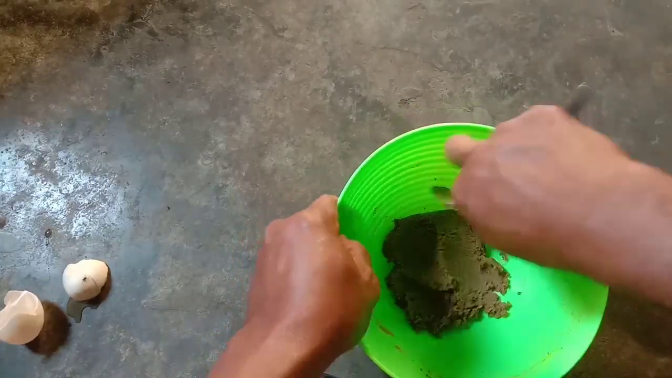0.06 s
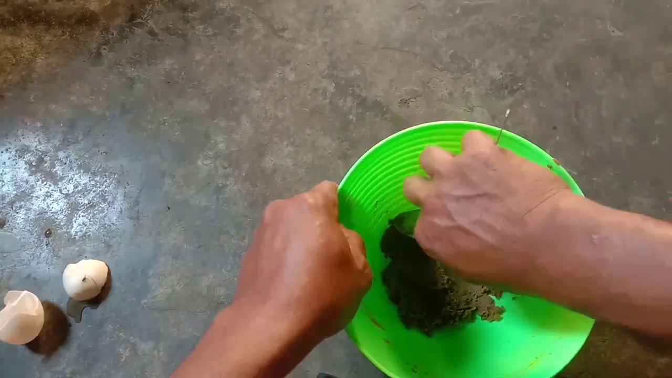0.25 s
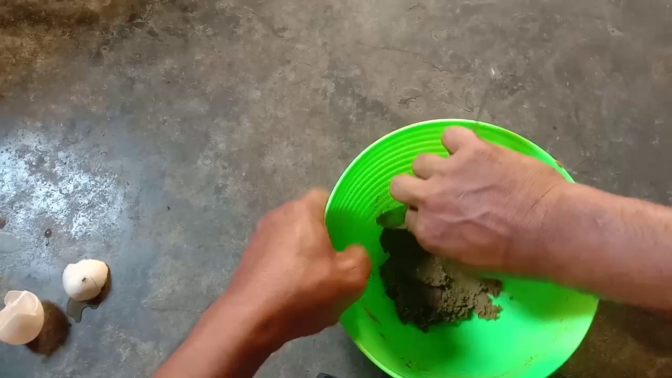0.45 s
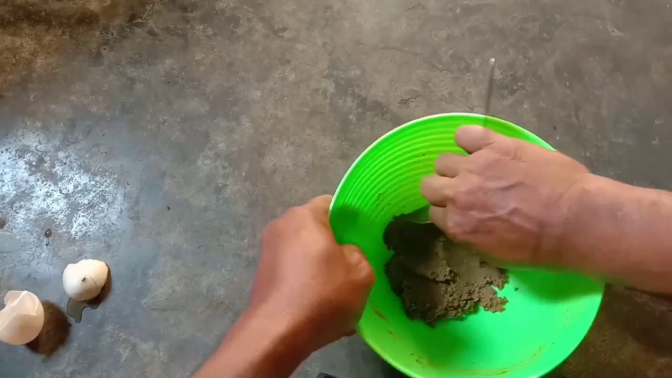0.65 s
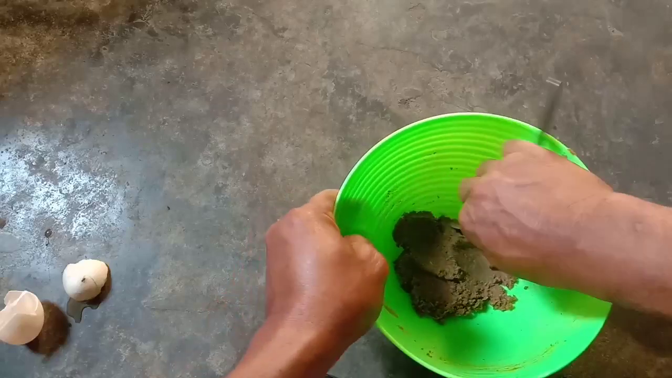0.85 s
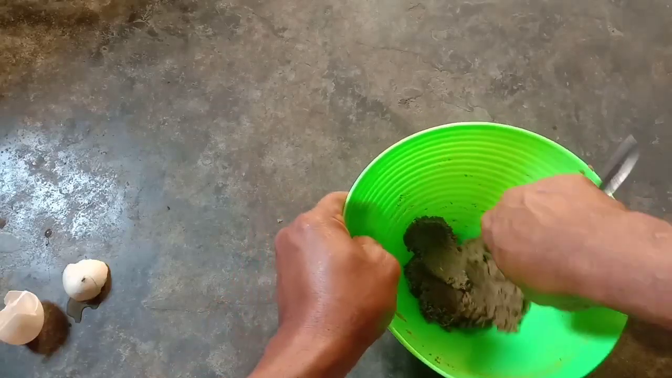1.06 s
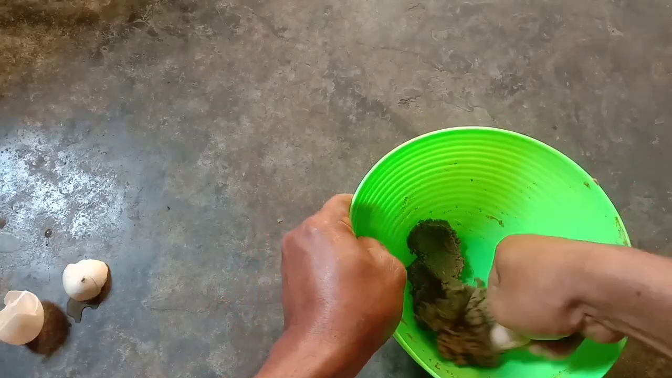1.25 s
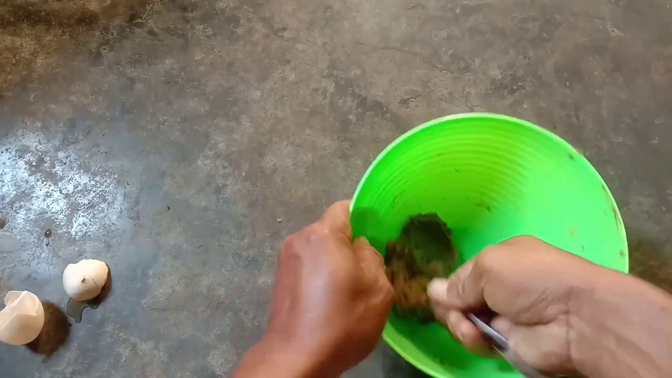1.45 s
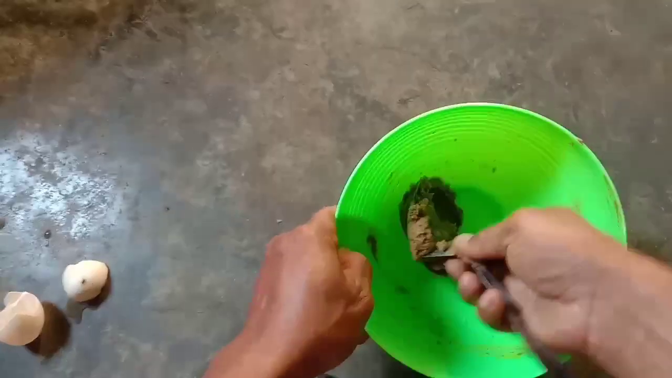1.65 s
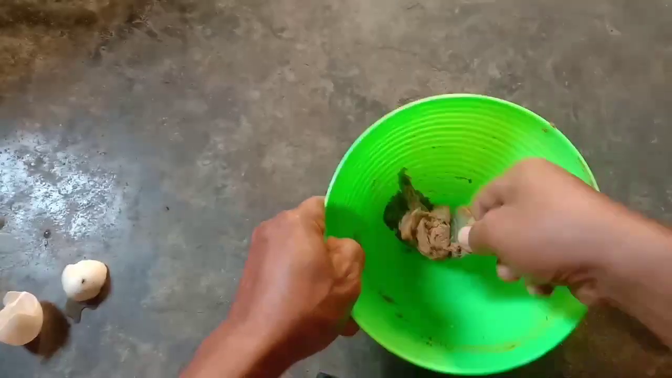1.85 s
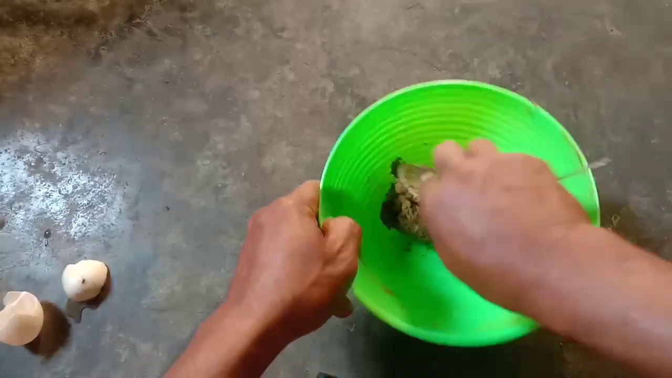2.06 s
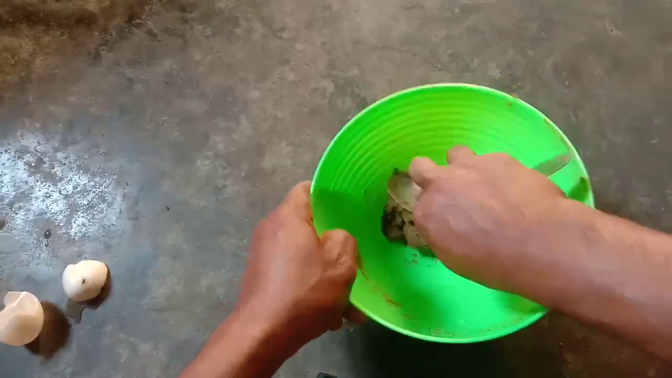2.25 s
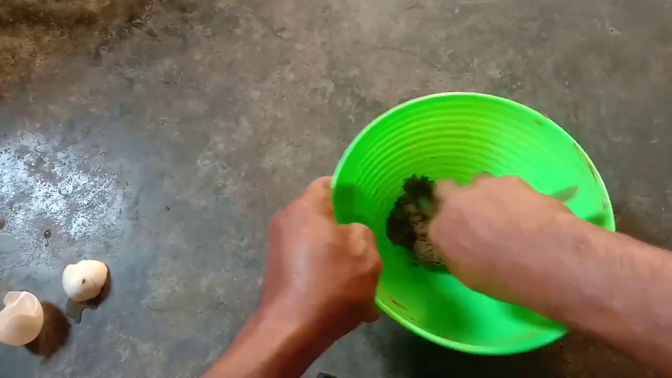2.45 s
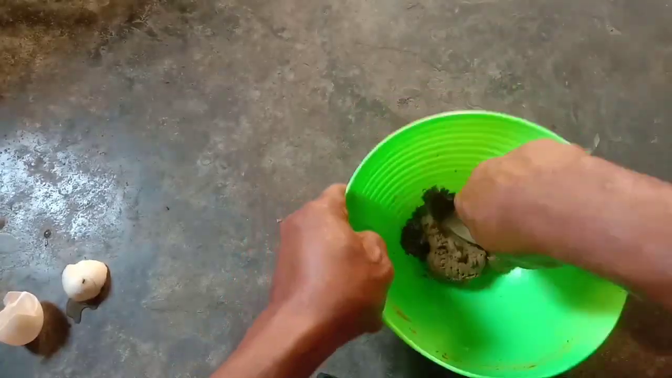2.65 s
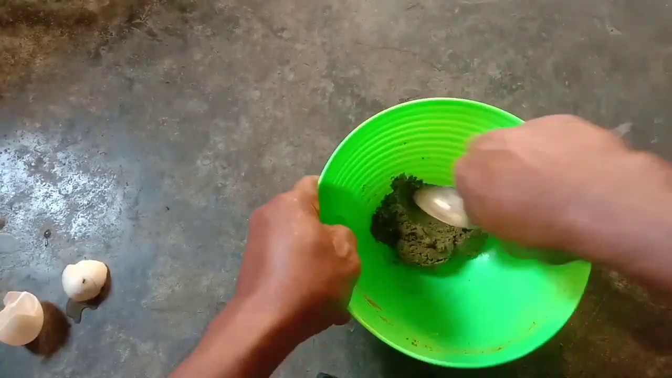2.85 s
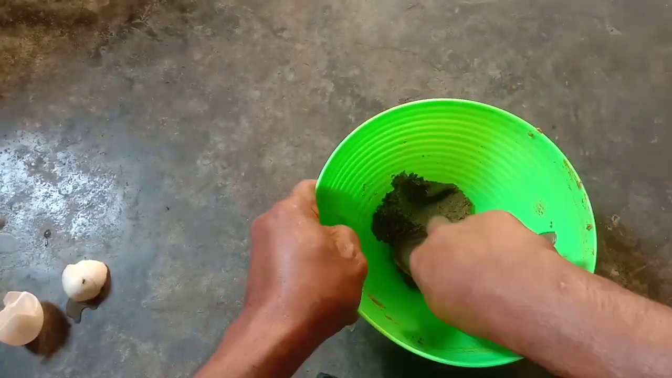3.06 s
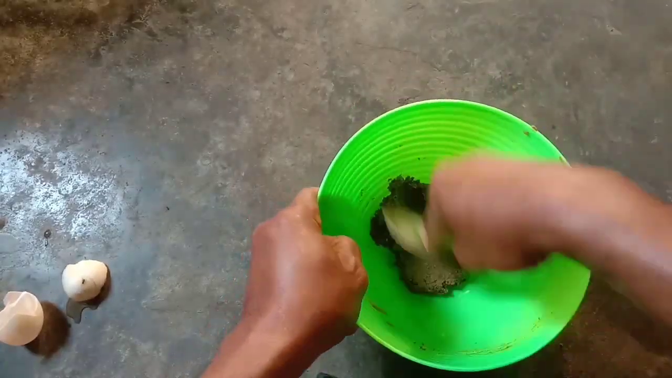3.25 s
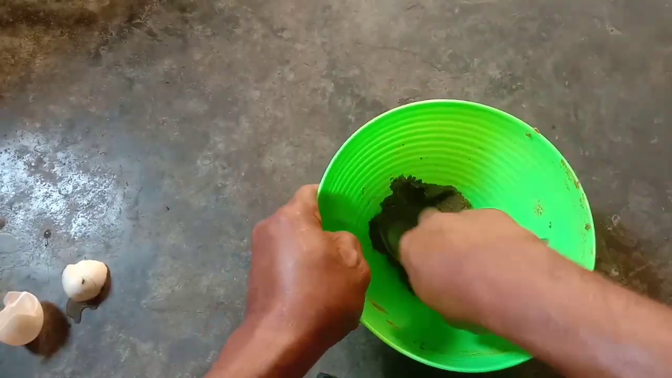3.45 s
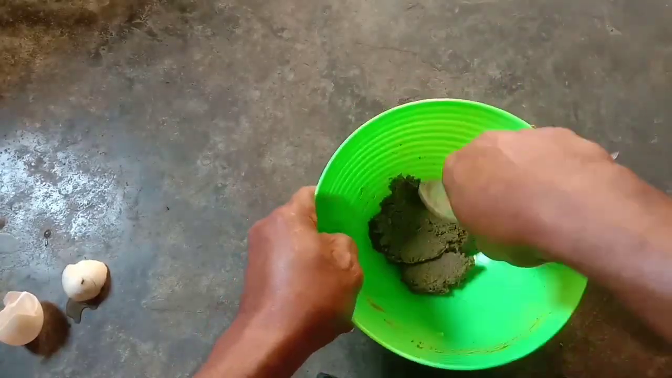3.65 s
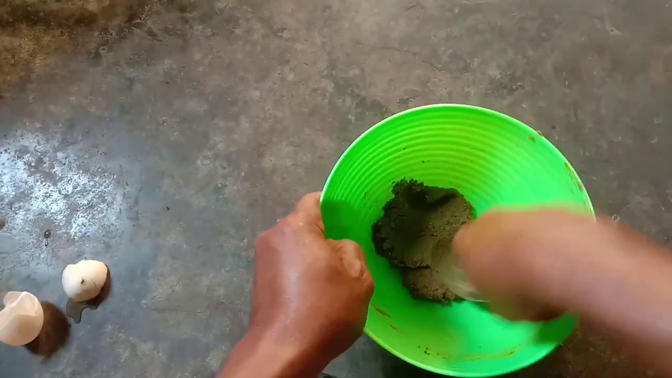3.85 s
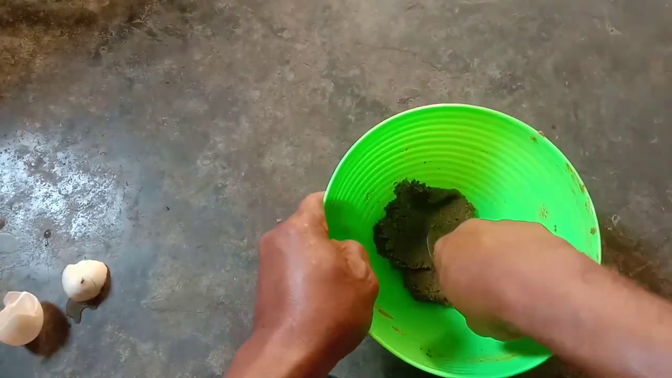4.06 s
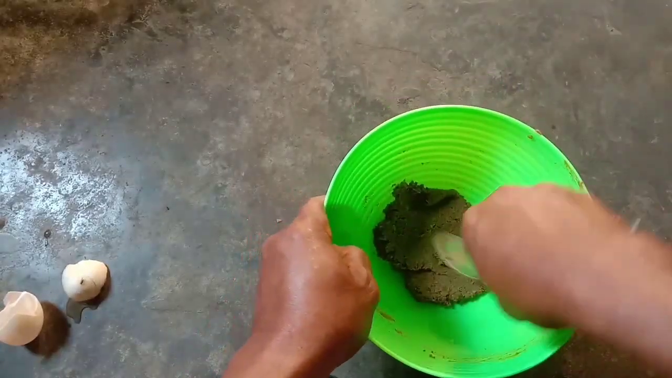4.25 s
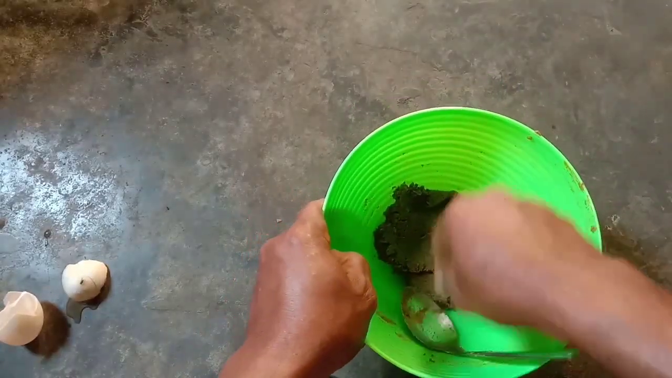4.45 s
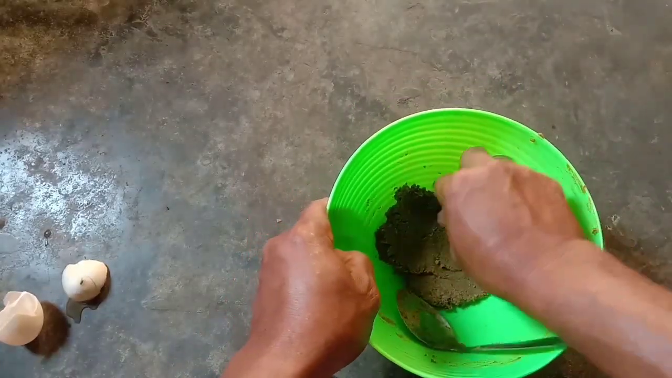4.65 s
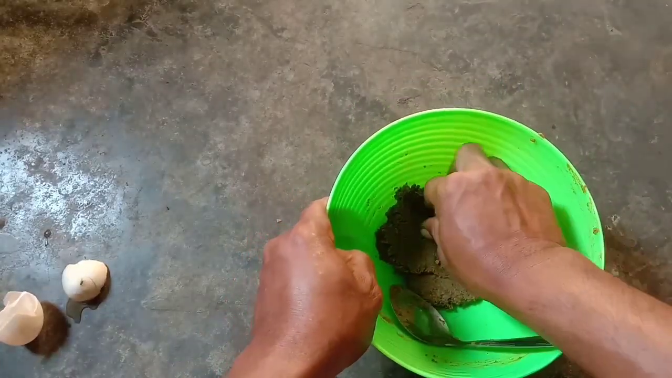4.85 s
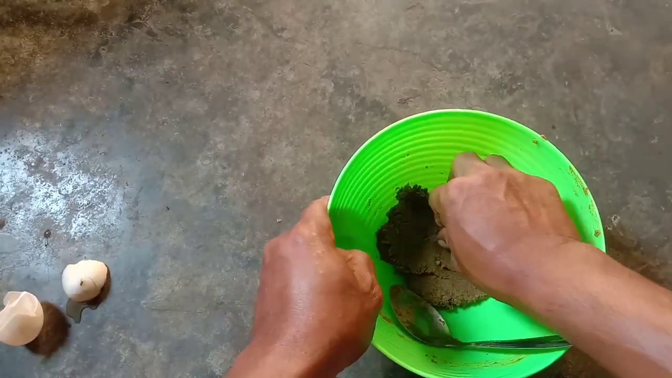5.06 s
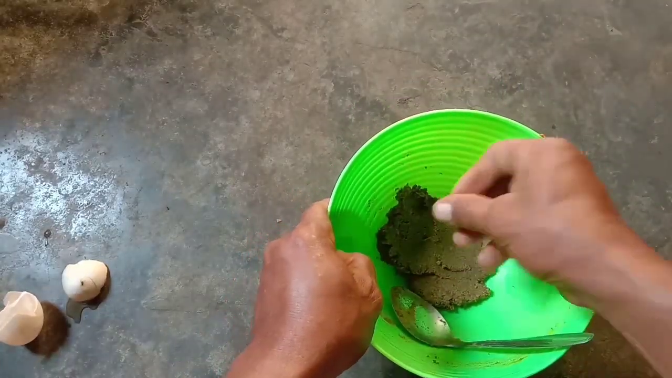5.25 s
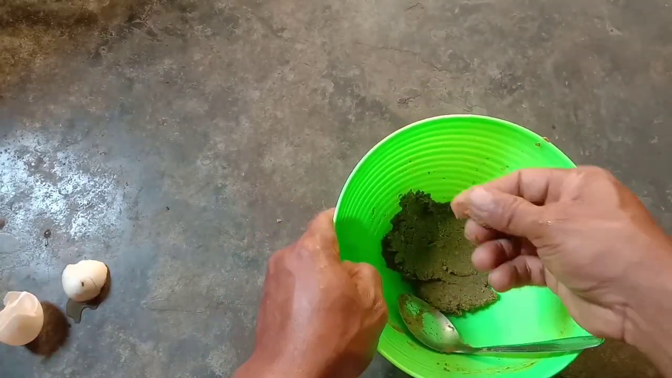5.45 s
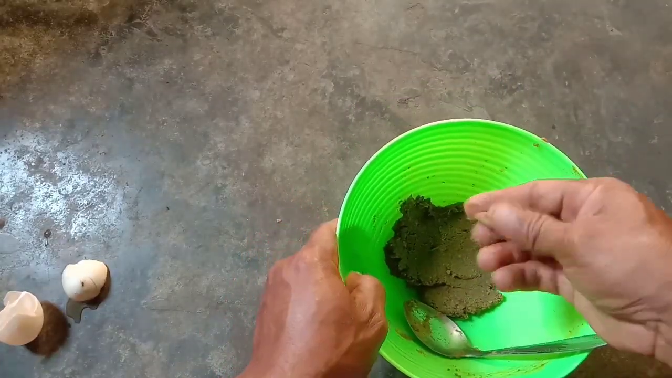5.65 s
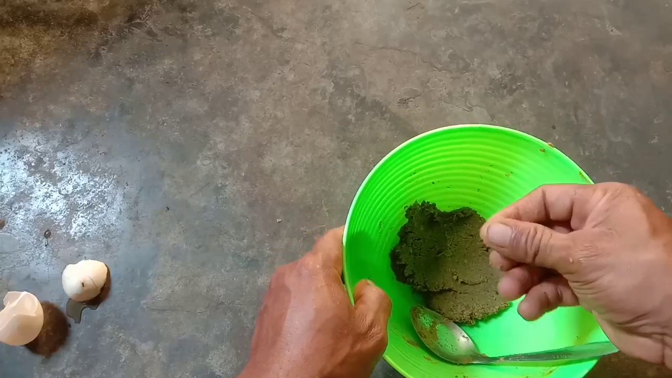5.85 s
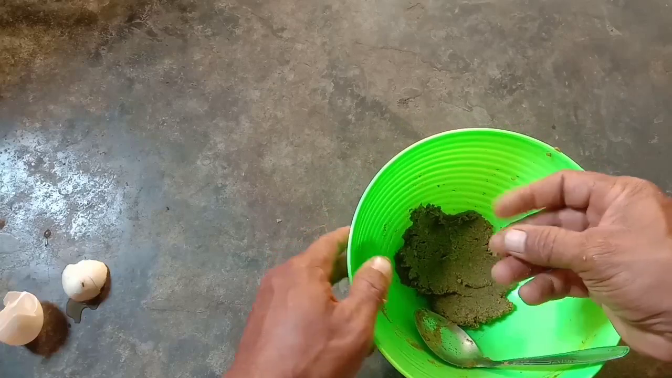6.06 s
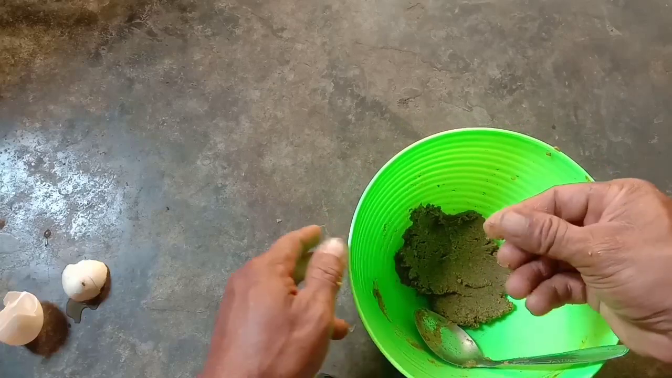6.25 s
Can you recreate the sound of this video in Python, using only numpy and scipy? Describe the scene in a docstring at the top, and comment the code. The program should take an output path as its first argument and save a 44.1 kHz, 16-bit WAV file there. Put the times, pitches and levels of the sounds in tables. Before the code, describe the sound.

Irregular hollow knocks of a plastic bowl on a hard floor, small spoon ticks and grainy scrapes, heard close by a phone with a short bare-room echo. The blade snaps off the wall, scoops the dough in paired strokes, then the spoon falls, rattles briefly and settles. After that almost nothing: a soft tap, faint rubbing, quiet air and microphone hiss.

```python
"""Spoon and stiff dough, close

Small bare room, concrete floor: a metal spoon works gritty dough in a plastic bowl, close to a phone.
Bowl knocks, spoon ticks, snaps of the slipping blade and the clatter and thump of the dropped spoon are
impulses ringing through resonances. Scraping blade, sliding spoon and rubbing fingers are random grains
coloured by dough and wall. Near echoes and a room tail follow, over faint tones and air and microphone hiss."""
import sys
import numpy as np
from scipy import signal
from scipy.fft import rfft, irfft
from scipy.io import wavfile
from scipy.ndimage import uniform_filter1d

SR = 44100
rng = np.random.default_rng(int(sys.argv[2]) if len(sys.argv) > 2 else 0)


def persist_wave(psi):
    """Save psi, clipped to +-1, as 16-bit WAV."""
    counts = np.round(np.clip(psi, -1, 1) * 32767).astype(np.int16)
    wavfile.write(sys.argv[1], SR, np.atleast_2d(counts).T)


N = 277822
T = np.arange(N) / SR  # s

# faint thin tones from far outside: [t/s, spread/s, f/Hz, level/dB]
FAR_TONES = [(2.206, 0.024, 1270, -66.5), (5.4, 0.037, 1182, -59.5)]
# colour of room air and microphone hiss: [f/Hz, level/dB]
HISS_COLOUR = [(25, -26), (65, -1), (150, -1.5), (400, -6.5), (900, -15), (1270, -10), (1800, -17.5),
               (5000, -20), (6500, -20.5), (7150, 0.5), (7600, -8.5), (8600, -28), (13500, -31),
               (15400, -22.5)]
HISS_DB = -67
# microphone port response: [f/Hz, level/dB]
PORT_RESPONSE = [(30, -7), (75, -5), (130, -1), (6100, 1), (6600, -7), (7200, 7.5), (7900, -4),
                 (8700, -3.5), (10500, -10.5), (13800, -15.5), (15000, 6), (15900, -5.5)]
TOP_HZ = 15750  # upper band edge of the phone
# decay of the bare room by band: [f/Hz, t60/s, echo level/dB]
ROOM_BANDS = [(100, 0.26, -3.5), (310, 0.31, -8), (720, 0.35, -9.5), (1391, 0.37, -7), (2950, 0.43, -10.5),
              (6000, 0.44, -8.5), (14000, 0.26, -12)]
# hand and arm throw the sound back: [delay t/s, level/dB]
HAND_ECHOES = [(.0029, -18.5), (.0056, -13.5)]

# the bowl knocks on the floor; the 213 Hz row is the low thump of the dropped spoon landing:
# [t/s, thud level/dB, pitch f/Hz]
LOW_BLOWS = [(.0464, -11.5, 660), (.0955, -26.5, 860), (.2418, -29.5, 595), (.28, -35, 600),
             (.442, -30, 596), (.4577, -18, 713), (.4653, -21.5, 510), (.6513, -9, 628), (.83, -30.5, 650),
             (1.1927, -27, 627), (1.394, -34.5, 670), (1.7633, -15, 507), (2.973, -46, 587),
             (3.2995, -12, 654), (3.4225, -26.5, 666), (3.606, -40, 546), (3.7535, -13.5, 647),
             (3.7801, -23, 570), (3.812, -27.5, 507), (3.836, -27.5, 580), (4.004, -31, 612),
             (4.0549, -25.5, 654), (4.3114, -22.5, 625), (4.3724, -31, 633), (4.4235, -30, 213),
             (4.699, -26, 538), (5.307, -44.5, 510)]
# low ring of bowl and room after a blow: [f/Hz, relative level/dB]
RING_MODES = [(138, -9.5), (292, -6.5), (316, -2), (386, 3), (482, -5), (522, -6), (574, -16), (644, -3),
              (700, -0.5), (760, 3.5), (836, 2), (1250, -2)]
RING_T60_S = 0.3  # at 400 Hz
BOOM_DB = -13.5  # boom of the wall, added to the thud
# colour of a hard contact: [f/Hz, level/dB]
CLICK_COLOUR = [(300, -7.5), (900, 3), (1250, 8), (1800, -3.5), (2400, 5.5), (4200, -5), (6000, -4.5),
                (8000, -15), (15000, -36)]
# a blow at HARD_KNOCK_DB has a click at CLICK_DB; growth is dB of click per dB of force
HARD_KNOCK_DB, CLICK_DB, CLICK_GROWTH = -8.5, -4, 0.85
CRUNCH_MS, CRUNCH_DB = 1.0, -15.5  # decay and level of the gritty roughness of each contact
# a knock above the first level makes the base land twice: delay and relative level
REBOUND_FROM_DB, REBOUND_S, REBOUND_DB = -11.5, 0.00335, -9

# plastic wall under the spoon: [f/Hz, width/Hz, level/dB]
WALL_MODES = [(1300, 150, 1), (1528, 560, 2), (1875, 290, -2), (2225, 720, 4), (2835, 620, 3),
              (3480, 1100, -6), (4120, 380, -15), (5300, 240, -10.5), (6126, 500, -0.5), (7580, 700, -5),
              (11960, 2000, -18)]
# the spoon strikes the wall; the two bright ones near 1.5 s are snaps as the blade slips off:
# [t/s, level/dB, brightness/dB per octave]
TICKS_AND_SNAPS = [(0.213, -31.5, -4), (0.395, -34.5, -7), (.4257, -29.5, -11.5), (.563, -17, -6.5),
                   (0.8285, -24.5, -6.5), (1.0283, -26.5, -7.5), (1.1168, -25.5, -6.5), (1.502, -16, 11.5),
                   (1.527, -20.5, 7.5), (1.9987, -45, -2), (3.2056, -30, 7), (3.778, -29.5, 4),
                   (4.6748, -26.5, -5), (4.724, -31, -7)]
CHATTER_MS, CHATTER_HALVING_DB = 0.76, 7.5  # decay at neutral brightness; added brightness that halves it
# the spoon is dropped and clatters to rest
DROP_S, DROP_DB, DROP_BRIGHTNESS_DB, DROP_CHATTER_MS = 4.405, -14, -3, 3
CLATTER_GAP_S, CLATTER_DB = 0.008, -5.5  # its rebounds, against the first blow
# steel spoon ringing after a blow: [f/Hz, relative level/dB, t60/s]
SPOON_MODES = [(1243, -11.5, 0.45), (1460, -12.5, .33), (2060, -1.5, 0.21), (2495, -2, 0.18),
               (3036, -10, 0.44), (4570, -9.5, 0.79)]
SPOON_RING_DB = -54

# colours of crushed grit and of dragged dough: [f/Hz, level/dB]
GRIT_COLOUR = [(600, -0.5), (950, -14.5), (1300, 5), (1850, 12), (2300, -1), (3000, 14.5), (4300, -2.5),
               (6000, 10.5), (7500, -11), (9500, -59.5), (16000, -52)]
DRAG_COLOUR = [(60, -30.5), (150, -5), (300, -2.5), (520, 6), (700, 5.5), (1000, -6), (1300, -20),
               (1900, -29.5), (5000, -47)]
SLIP_DB, SLIPS_PER_S = 3.5, 380  # unevenness and rate of the blade's sticking and slipping
# one long scrape round the wall: [t/s, force/dB, finest sand level/dB]
SCRAPE_PATH = [(0.7, -53, -95), (0.776, -53, -85.5), (0.826, -46, -86), (0.878, -34, -58), (0.92, -52, -85),
               (1.01, -47, -98), (1.03, -34.5, -69), (1.046, -33, -53.5), (1.068, -44, -74),
               (1.124, -37.5, -64.5), (1.168, -50.5, -72), (1.268, -50, -94), (1.29, -37.5, -58.5),
               (1.318, -52, -67), (1.39, -41.5, -57), (1.416, -73, -90), (1.438, -46, -62.5),
               (1.485, -63.5, -111)]
SCRAPE_GRIT_DB = -4.5  # grit against the force
SCRAPE_DRAG_DB, SCRAPE_CLEARING_DB_PER_S = -48, -20.5  # the drag fades as the blade leaves the dough
# pressing harder raises the rasp
LIGHT_RASP_HZ, HEAVY_RASP_HZ, LIGHT_FORCE_DB, HEAVY_FORCE_DB = 1400, 2640, -52.5, -35.5
# the edge bites, then the back shoves the dough; in the last row the dropped spoon slides and lands in it:
# [first push t/s, wait for second/ms, first level/dB, second level/dB]
SCOOPS_AND_SLIDE = [(1.535, 87, -50.5, -39), (2.06, 84, -78.5, -64.5), (2.675, 82.5, -54, -40.5),
                    (3.215, 52, -52, -43.5), (3.559, 73, -64, -57), (4.395, 41, -56.5, -38)]
FIRST_WIDTH, SECOND_WIDTH = 0.46, 0.28  # rise time as a share of the wait between them
# blade or fingers rub over the dough: [t/s, rise/ms, level/dB, rasp f/Hz]
DOUGH_RUBS = [(.012, 37, -44.5, 2230), (.125, 95, -60.5, 2240), (.525, 20, -58, 3500),
              (1.865, 67, -60.5, 3300), (2.309, 22, -58, 2700), (3.865, 19.5, -60.5, 4300),
              (4.126, 70, -72, 4200), (5.515, 108, -68, 3200), (5.94, 69, -67.5, 3500)]
RELEASE_SHARE = 0.58  # the force lets go in this share of its rise time
# touch of the first push and of the second: [grit level/dB, drag level/dB, finest sand level/dB, rasp f/Hz]
FIRST_TOUCH = (-2.5, 1, -10.5, 4990.5)
SECOND_TOUCH = (-9.5, 0.5, -47, 3108)
# touch of a rub, which has its own rasp: [grit level/dB, drag level/dB, finest sand level/dB]
RUB_TOUCH = (0, .5, -32.5)


def undb(db):
    """Decibels to gain."""
    return 10 ** (np.asarray(db) / 20)


def unit(x):
    """Scale to standard deviation 1."""
    return x / np.std(x)


def crest(x):
    """Scale to peak 1."""
    return x / np.max(np.abs(x))


def add(track, s, sound):
    """Mix a sound into a track at time s."""
    i = max(int(s * SR), 0)
    track[i:i + len(sound)] += sound[:len(track) - i]


def convolve(x, response):
    """Pass x through an impulse response."""
    return signal.fftconvolve(x, response)[:len(x)]


def resonate(x, hz, width_hz):
    """One resonance, gain 1 at its centre."""
    b, a = signal.iirpeak(min(hz, SR / 2 - 1), hz / width_hz, fs=SR)
    return signal.lfilter(b, a, x)


def colour(x, points, size=4096):
    """Causal minimum-phase filter through (Hz, dB) points, made by folding the cepstrum."""
    hz, db = np.transpose(points)
    gain_db = np.interp(np.log(np.fft.rfftfreq(size, 1 / SR) + 1), np.log(hz), db)
    cepstrum = irfft(np.log(undb(gain_db)))
    cepstrum[1:size // 2] *= 2
    cepstrum[size // 2 + 1:] = 0
    return convolve(x, irfft(np.exp(rfft(cepstrum))))


def walk(rate, size=N):
    """Smoothed random steps of spread 1, rate of them a second."""
    hold = max(int(SR / rate), 1)
    steps = np.repeat(rng.standard_normal(size // hold + 1), hold)[:size]
    return unit(uniform_filter1d(steps, hold))


def hiss():
    """Quiet room air and the microphone's own narrow hiss, wavering slightly in level."""
    steady = unit(colour(rng.standard_normal(N), HISS_COLOUR))
    return undb(HISS_DB) * steady * undb(.6 * walk(18))


def far_tones():
    """Soft sines of wavering pitch that swell and fade, from far outside."""
    waver = 1 + 0.0206 * walk(140)
    out = 0
    for s, spread_s, hz, db in FAR_TONES:
        swell = np.exp(-.5 * ((T - s) / spread_s) ** 2)
        out = out + undb(db) * swell * np.sin(2 * np.pi * np.cumsum(hz * waver) / SR)
    return out


def room(x):
    """Bare walls return a dense tail, decaying at its own pace in each band."""
    hz, t60, wet_db = np.transpose(ROOM_BANDS)
    t, bins = T[:SR], np.arange(SR // 2 + 1)  # one second, so bins fall 1 Hz apart
    noise, response = rfft(rng.standard_normal(SR)), 0
    for share, decay, db in zip(np.eye(len(hz)), t60, wet_db):
        # neighbouring bands overlap as triangles in log frequency
        band = irfft(noise * np.interp(np.log(bins + 1), np.log(hz), share), SR)
        envelope = np.exp(-np.log(1000) * t / decay) * (1 - np.exp(-t / .009))
        response = response + undb(db) * band * envelope / np.linalg.norm(envelope)
    return convolve(x, response)


def low_ring():
    """Higher modes die sooner; each has a close, weaker twin, so the ring beats as it fades."""
    t, ring = T[:SR], 0
    for (hz, db), split in zip(RING_MODES, rng.uniform(-.035, .035, len(RING_MODES))):
        twin = .7 * np.sin(2 * np.pi * hz * (1 + split) * t)
        pair = np.sin(2 * np.pi * hz * t) + twin
        t60 = RING_T60_S * np.sqrt(400 / hz)
        ring = ring + undb(db) * pair * np.exp(-np.log(1000) * t / t60)
    return ring * (1 - np.exp(-t / 0.0058))


def low_contacts():
    """Every low blow, and the quick rebound of the hard knocks, as (s, level dB, pitch Hz)."""
    for s, db, pitch_hz in LOW_BLOWS:
        yield s, db, pitch_hz
        if db > REBOUND_FROM_DB:
            yield s + REBOUND_S, db + REBOUND_DB, pitch_hz


def knocks_and_thump(size=4096):
    """Bowl on floor, or dropped spoon landing: a thud at its own pitch, a wall boom, a click, a low ring."""
    out = np.zeros(N)
    blow = signal.unit_impulse(size)
    boom = resonate(resonate(blow, hz=300, width_hz=220), hz=300, width_hz=700)
    for s, db, pitch_hz in low_contacts():
        body = resonate(blow, pitch_hz, width_hz=300)
        # the dough cushions the blow and takes the treble away
        cushion = signal.butter(6, pitch_hz * 1.5, fs=SR, output="sos")
        thud = crest(signal.sosfilt(cushion, body + undb(BOOM_DB) * boom))
        # a fresh noise burst roughens each contact differently, as dust does under the base
        crunch = undb(CRUNCH_DB) * rng.standard_normal(size) * np.exp(-T[:size] * 1000 / CRUNCH_MS)
        click = crest(colour(blow + crunch, CLICK_COLOUR))
        # a softer contact lasts longer, so its click is weaker and duller
        click_db = CLICK_DB + CLICK_GROWTH * (db - HARD_KNOCK_DB)
        edge = signal.butter(4, min(15000 * undb(click_db / 2), 15000), fs=SR, output="sos")
        add(out, s, undb(db) * (thud + undb(click_db) * signal.sosfilt(edge, click)))
    return out + undb(-57) * convolve(out, low_ring())


def wall(push, scatter_db=2):
    """The thin plastic wall answers with its short modes, mixed at random for each call."""
    out = 0
    for (hz, width, db), chance in zip(WALL_MODES, rng.standard_normal(len(WALL_MODES))):
        mode = resonate(resonate(push, hz, width), hz, width)
        out = out + undb(db + scatter_db * chance) * mode
    return out


def spoon_ring(size=SR):
    """The thin, fading sine modes of the steel."""
    t, ring = T[:size], 0
    for hz, db, t60 in SPOON_MODES:
        ring = ring + undb(db) * np.sin(2 * np.pi * hz * t) * np.exp(-np.log(1000) * t / t60)
    return ring


def spoon_contacts(count=3):
    """Ticks and snaps, then the drop and its rebounds, as (s, level dB, brightness dB per octave, chatter ms)."""
    for s, db, tilt_db in TICKS_AND_SNAPS:
        yield s, db, tilt_db, CHATTER_MS * 2 ** (-tilt_db / CHATTER_HALVING_DB)
    for k in range(count + 1):
        db = DROP_DB + CLATTER_DB * (k > 0)
        yield DROP_S + k * CLATTER_GAP_S, db, DROP_BRIGHTNESS_DB, DROP_CHATTER_MS


def spoon_blows(size=2048):
    """The spoon strikes, snaps off or clatters: an impulse and brief chatter excite the wall; the steel rings."""
    out, t = np.zeros(N), T[:size]
    for s, db, tilt_db, chatter_ms in spoon_contacts():
        chatter = .35 * rng.standard_normal(size) * np.exp(-t / (chatter_ms / 1000))
        push = signal.unit_impulse(size) + chatter
        tilt = [(1000, 0), (16000, 4 * tilt_db)]  # four octaves
        sound = wall(push, scatter_db=1) + undb(-9) * colour(push, CLICK_COLOUR)
        add(out, s, undb(db) * crest(colour(sound, tilt)))
    out = out + undb(SPOON_RING_DB) * convolve(out, spoon_ring())
    return signal.sosfilt(signal.butter(3, 850, "high", fs=SR, output="sos"), out)


def grains(rate, spread_db, size):
    """Tiny fractures of unequal size and either sign at random moments, rate of them a second."""
    signs = rng.choice([-1, 1], size)
    sizes = signs * undb(spread_db * np.clip(rng.standard_normal(size), -2, 2))
    return unit((rng.random(size) < rate / SR) * sizes)


def reflected(x):
    """The far wall of the bowl adds a near echo whose path glides as the blade travels."""
    i = np.arange(len(x))
    path_s = np.linspace(*rng.uniform(.0004, .0014, 2), len(x))
    return x + .5 * np.interp(i - path_s * SR, i, x)


def friction(rasp_hz, size):
    """Steady sliding as (grit, drag, sand): grit is crushed against the wall, stiff dough drags on the base."""
    treble = signal.butter(4, 8200, "high", fs=SR, output="sos")
    # the blade sticks and slips, so the grains come in short spurts
    slips = undb(SLIP_DB * walk(SLIPS_PER_S, size=size))
    crush = reflected(slips * grains(rate=3200, spread_db=5.5, size=size))
    # the pressed blade picks out one resonance, which depends on where it bears
    rasp = resonate(resonate(crush, rasp_hz, width_hz=1300), rasp_hz, width_hz=1500)
    grit = undb(-11.5) * unit(colour(crush, GRIT_COLOUR))
    grit = grit + undb(-0.5) * unit(wall(crush, scatter_db=1))
    grit = grit + undb(-2.5) * unit(rasp)
    drag = undb(1) * unit(colour(grains(rate=1100, spread_db=4, size=size), DRAG_COLOUR))
    sand = undb(5.0) * unit(signal.sosfilt(treble, crush))
    return grit, drag, sand


def pushes():
    """Scoops, the dropped spoon's slide and landing, and rubs, as (s, rise ms, level dB, way of touching)."""
    for s, lag_ms, first_db, second_db in SCOOPS_AND_SLIDE:
        yield s, FIRST_WIDTH * lag_ms, first_db, FIRST_TOUCH
        yield s + lag_ms / 1000, SECOND_WIDTH * lag_ms, second_db, SECOND_TOUCH
    for s, rise_ms, db, rasp_hz in DOUGH_RUBS:
        yield s, rise_ms, db, (*RUB_TOUCH, rasp_hz)


def short_pushes(size=22050):
    """Each short push on the dough swells as half a bell curve and lets go a little faster."""
    out = np.zeros(N + size)
    ms = (np.arange(size) - size // 2) / SR * 1000  # from the peak of the force
    for s, rise_ms, db, (grit_db, drag_db, sand_db, rasp_hz) in pushes():
        spread_ms = np.where(ms < 0, rise_ms, RELEASE_SHARE * rise_ms)
        force = undb(db) * np.exp(-.5 * (ms / spread_ms) ** 2)
        grit, drag, sand = friction(rasp_hz, size=size)
        add(out, s, force * (undb(grit_db) * grit + undb(drag_db) * drag + undb(sand_db) * sand))
    return out[size // 2:][:N]  # puts the peaks at their listed times


def long_scrape():
    """The blade travels round the wall; its force sets the loudness and blends from low to high rasp."""
    s, force_db, sand_db = np.transpose(SCRAPE_PATH)
    t = T[(T >= s[0]) & (T <= s[-1])]
    force_db, sand_db = np.interp(t, s, force_db), np.interp(t, s, sand_db)
    light, drag, _ = friction(LIGHT_RASP_HZ, size=len(t))
    heavy, _, sand = friction(HEAVY_RASP_HZ, size=len(t))
    pressed = np.interp(force_db, [LIGHT_FORCE_DB, HEAVY_FORCE_DB], [0, 1])
    grit = np.sqrt(1 - pressed) * light + np.sqrt(pressed) * heavy
    drag_db = SCRAPE_DRAG_DB + SCRAPE_CLEARING_DB_PER_S * (t - s[0])
    out = np.zeros(N)
    add(out, s[0], undb(force_db + SCRAPE_GRIT_DB) * grit + undb(drag_db) * drag + undb(sand_db) * sand)
    return out


def scene():
    """Bowl, spoon and room reach one microphone port; the channels hardly differ."""
    direct = knocks_and_thump() + spoon_blows() + long_scrape() + short_pushes()
    near = direct.copy()
    for delay_s, db in HAND_ECHOES:
        add(near, delay_s, undb(db) * direct)
    mid = colour(near + room(direct), PORT_RESPONSE) + far_tones() + hiss()
    side = undb(-46) * colour(room(direct), PORT_RESPONSE) + undb(-11) * hiss()
    return np.array([mid + side, mid - side])


def record(dry):
    """The phone cuts the deepest rumble gently and the top steeply."""
    dry = signal.sosfilt(signal.butter(1, 40, "high", fs=SR, output="sos"), dry)
    return signal.sosfilt(signal.ellip(8, .2, 70, TOP_HZ, fs=SR, output="sos"), dry)


dry = scene()
out = record(dry)
persist_wave(out)
```